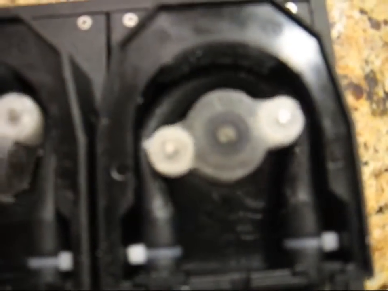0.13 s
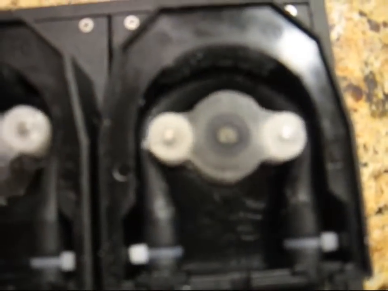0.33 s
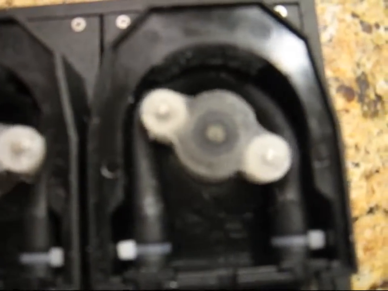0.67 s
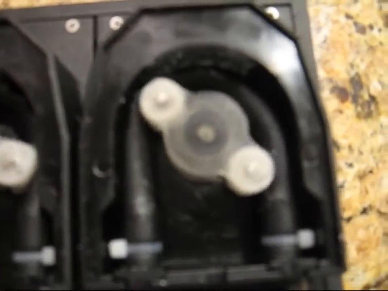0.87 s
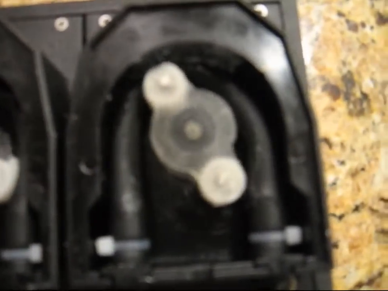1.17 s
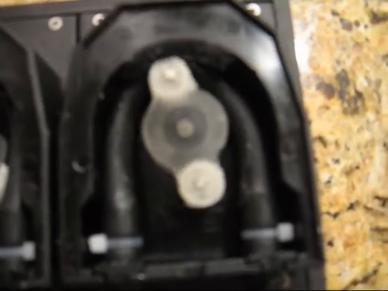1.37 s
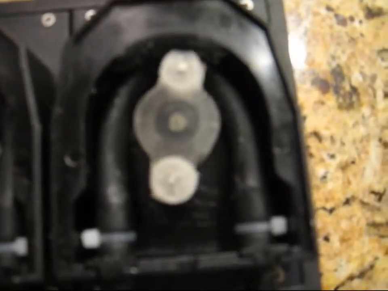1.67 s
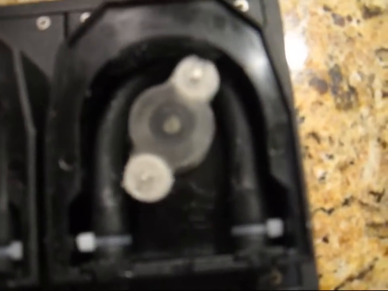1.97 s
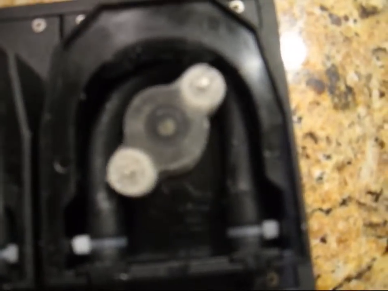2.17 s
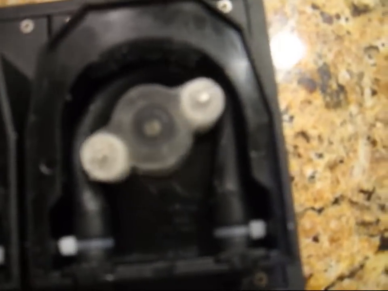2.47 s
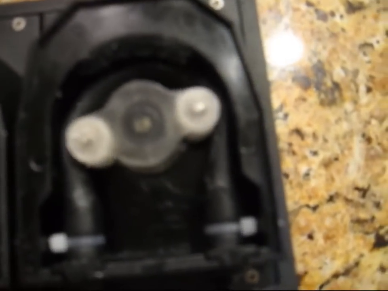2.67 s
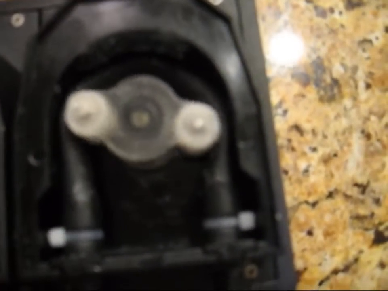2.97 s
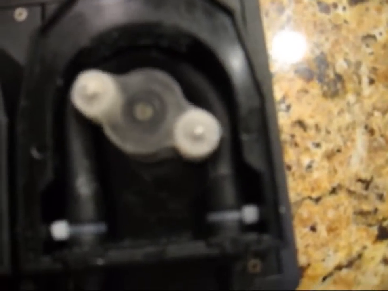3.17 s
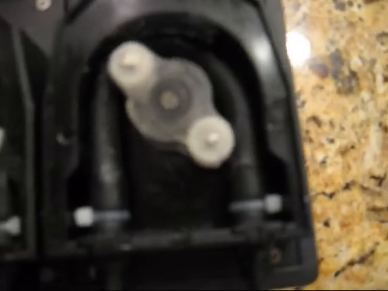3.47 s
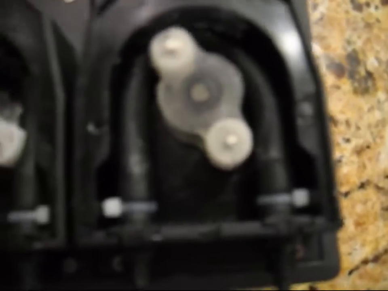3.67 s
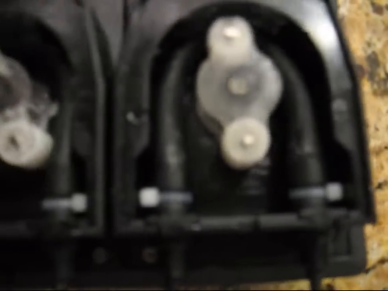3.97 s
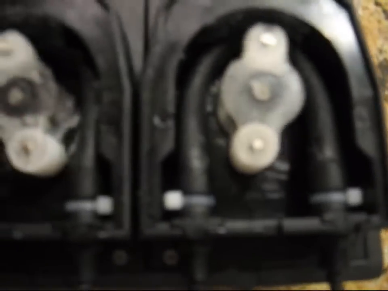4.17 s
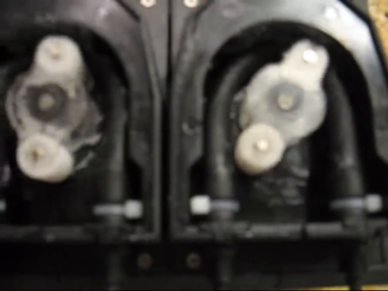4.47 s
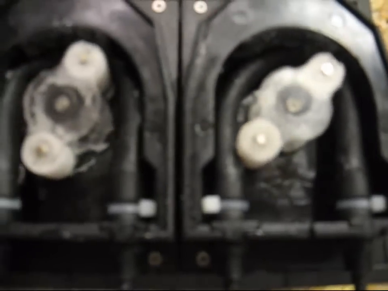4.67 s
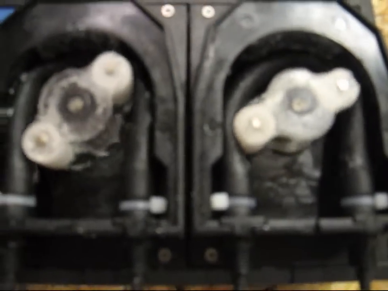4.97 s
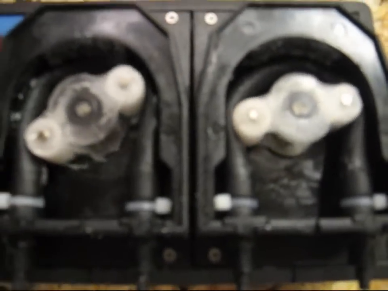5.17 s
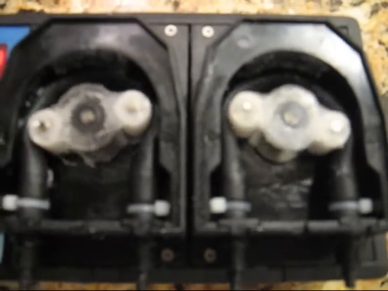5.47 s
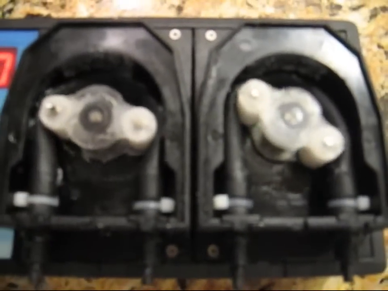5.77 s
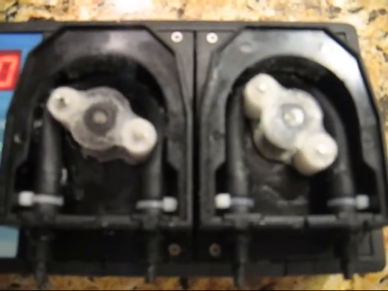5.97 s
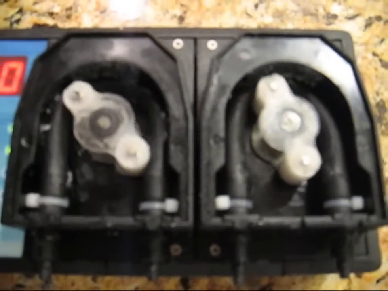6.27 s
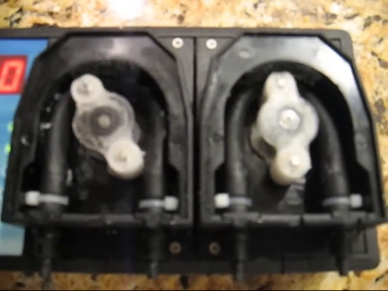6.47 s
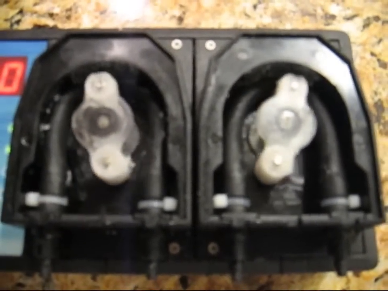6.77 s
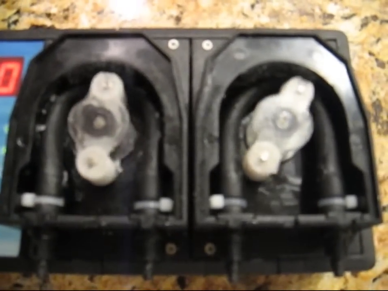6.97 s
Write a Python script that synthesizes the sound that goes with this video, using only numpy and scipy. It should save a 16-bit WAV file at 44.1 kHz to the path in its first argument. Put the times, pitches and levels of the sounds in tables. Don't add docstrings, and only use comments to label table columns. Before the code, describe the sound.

Two geared roller pumps run on a stone counter indoors, heard very close through a cheap, grainy small-camera microphone. A steady low-mid whine throbs over mains hum and gear rasp, with hoarse squeaks swelling as rollers press tubing. Fingers tick on the camera shell; around five seconds two loud plastic creaks make the pumps drop out briefly, then return.

```python
import sys
import numpy as np
from scipy import signal
from scipy.fft import rfft, irfft
from scipy.io import wavfile
from scipy.ndimage import uniform_filter1d, map_coordinates

SR = 44100
rng = np.random.default_rng(int(sys.argv[2]) if len(sys.argv) > 2 else 0)


def digitize_waveform(pressure):
    field = np.atleast_2d(pressure).T
    bounded = np.clip(field, -1, 1)
    quanta = np.round(bounded * 32767).astype(np.int16)
    wavfile.write(sys.argv[1], SR, quanta)


def volts_from_db(level):
    exponent = np.asarray(level, float) / 20
    return 10 ** exponent


N = 313992
TIME = np.arange(N) / SR
STORE_HZ, STORE_OFFSET = 11024, .4377


def curve(rows, col=1):
    return np.interp(TIME, [r[0] for r in rows], [r[col] for r in rows])


def unit(x):
    return x / np.sqrt(np.mean(x ** 2))


def band(x, hz, width_hz):
    return unit(signal.lfilter(*signal.iirpeak(hz, hz / width_hz, fs=SR), x))


def walk(rate_hz):
    hold = int(SR / rate_hz)
    steps = np.repeat(rng.standard_normal(N // hold + 1), hold)
    return unit(uniform_filter1d(uniform_filter1d(steps, hold), hold)[:N])


def sine(phase):
    return np.sqrt(2) * np.sin(phase + 2 * np.pi * rng.random())


def add(out, s, sound):
    i = int(s * SR)
    out[i:i + len(sound)] += sound[:N - i]


def hiss():
    return volts_from_db(-63) * band(rng.standard_normal(N), 2190, 3000.)


def tail(x):
    t = np.arange(6000) / SR
    t60_s = .18
    bands = sum(band(rng.standard_normal(len(t)), hz, 300.) for hz in (800, 2300, 3200))
    ringing = bands * volts_from_db(-60 * t / t60_s)
    return volts_from_db(-17) * signal.fftconvolve(x, ringing / np.sqrt(np.sum(ringing ** 2)))[:N]


def crack(hz, width_hz, decay_s=.0007):
    burst = rng.standard_normal(2048) * np.exp(-np.arange(2048) / SR / decay_s)
    out = band(band(burst, hz, width_hz), hz, 1.3 * width_hz)
    return out / abs(out).max()


def jolt():
    t = np.arange(2048) / SR
    push_s = 0.0017
    push = 0.13 * t / push_s * np.exp(1 - t / push_s)
    panels = np.sin(2 * np.pi * 259.0 * t) + 2.05 * np.sin(2 * np.pi * 574.0 * t)
    return push + panels * np.exp(-t / 0.0024)


# pitch in Hz, level in dB, 60 dB decay in seconds.
SHELL_MODES = [(570, -8, .03), (850, -7, .024), (1150, -3, .022), (1345, -1, .022), (1600, -1, .022),
               (1900, -1, .02), (2310, -2, .018), (2650, -4, .016), (3150, -5, .016), (3600, -14, .012),
               (4600, -24, .012), (5130, -22, .012)]


def ring(centre_hz, crack_db, decay_share, crack_hz, spread=0.73):
    t = np.arange(2048) / SR
    hz, db, t60 = np.transpose(SHELL_MODES)[:, :, None]
    chance = rng.standard_normal((3, len(hz), 1))
    nearness = np.exp(-(np.log(hz / centre_hz) / spread) ** 2)
    gain = volts_from_db(.6 * db + chance[0]) * nearness
    phase = 2 * np.pi * hz * (1 + .03 * chance[1]) * t + 3 * chance[2]
    push = 1 - np.exp(-(t / .0005) ** 2)
    modes = push * (gain * np.sin(phase) * volts_from_db(-60 * t / (decay_share * t60))).sum(axis=0)
    both = modes / abs(modes).max() + volts_from_db(crack_db + 12.0) * crack(crack_hz, 1200.0)
    return np.r_[np.zeros(30), both / abs(both).max()]


# start in seconds, peak in dB, ring centre in Hz, crack in dB.
FINGER_TICKS = [(1.0757, -19, 1300, -14), (1.084, -22, 1500, -29), (1.0942, -24, 1830, -19),
                (1.1076, -31, 2510, -39), (1.3358, -37, 2480, -18), (1.436, -25.5, 2400, -25),
                (1.4347, -21.5, 1260, -18), (2.1814, -19, 2960, -4), (2.1845, -26, 1280, -30),
                (3.571, -29, 1690, -43), (3.7588, -38, 2480, -16), (3.93, -30.5, 1710, -17),
                (4.358, -32, 1550, -12), (4.804, -33, 1472, -1), (4.8373, -16.5, 1280, -31),
                (4.8762, -23, 1500, -30), (5.2885, -23.5, 1805, -38), (5.3014, -19.5, 1214, -38),
                (5.3618, -14.5, 1180, -36), (5.371, -17.5, 1800, -39), (5.5256, -30.5, 1150, -27),
                (5.57, -31, 1200, -35), (5.5966, -34, 1840, -25), (5.787, -34.5, 1210, -29.5),
                (6.069, -21, 1500, -8.5), (6.077, -25, 1700, -26), (6.084, -19, 1120, -36),
                (6.103, -34, 2530, -28)]


def ticks():
    out = np.zeros(N)
    for s, db, hz, crack_db in FINGER_TICKS:
        add(out, s, volts_from_db(db) * ring(hz, crack_db, .82, 3640))
    return out


# start in seconds, peak in dB.
DRY_SNAPS = [
    (0.3735, -27),
    (1.939, -27.5),
    (2.1814, -19.5),
    (6.937, -18),
]


def snaps():
    out = np.zeros(N)
    for s, db in DRY_SNAPS:
        add(out, s + 0.00051, volts_from_db(db) * crack(3700., 3000., decay_s=0.000071))
    return out


# start in seconds, peak in dB, ring centre in Hz, crack in dB, jolt in dB relative to the peak.
SHELL_SLIPS = [(4.8835, -22, 2900, -12, -24), (4.888, -12, 2900, -14, -8), (4.8968, -23, 1200, -16, 1.5),
               (4.8995, -12.5, 2100, -10, -12), (4.908, -30, 2600, -20, -14), (4.912, -11, 2330, -18, -6),
               (4.9153, -11, 2000, -16, -11.5), (4.918, -12, 2500, -24, -21), (4.925, -9.5, 2500, -23, -16),
               (4.9315, -16.5, 1400, -15, -18), (4.936, -16, 1300, -20, -16),
               (4.941, -21, 2500, -14.5, -13), (5.0645, -6, 1500, -32, -19.5),
               (5.3565, -26, 1140, -30, -1.5), (5.374, -17, 1700, -38, -13), (5.377, -16, 1290, -33, -17),
               (5.3806, -11.5, 1900, -32, -6), (5.382, -6.5, 1300, -27, -9), (5.386, -10, 1900, -21, -19),
               (5.393, -10.5, 2300, -11.5, -26), (5.3955, -17, 2800, -21, -22),
               (5.398, -24, 1300, -20, -13)]


def slips():
    out = np.zeros(N)
    for s, db, hz, crack_db, jolt_db in SHELL_SLIPS:
        add(out, s + 0.00037, volts_from_db(db) * ring(hz, crack_db - 0.5, 0.83, crack_hz=5230.0, spread=0.94))
        add(out, s, volts_from_db(db + jolt_db - 4) * jolt() * rng.choice([-1, 1]))
    return out


# start in seconds, peak in seconds, end in seconds, peak in dB.
SHELL_CREAKS = [
    (4.869, 4.921, 4.948, -7.5),
    (5.361, 5.392, 5.412, -9),
]


def scrapes():
    grit = volts_from_db(3.5 * walk(500.)) * rng.standard_normal(N)
    scrape = unit(sum(volts_from_db(.6 * db) * band(band(grit, hz, 350.), hz, 350.) for hz, db, _ in SHELL_MODES))
    out = np.zeros(N)
    for start, peak, end, db in SHELL_CREAKS:
        swell = [(start - .004, -90), (start, db - 16), (peak, db), (end, db - 29), (end + .004, -90)]
        out += volts_from_db(curve(swell) - 13) * scrape
    return out


# start in seconds, gain reached in dB.
GAIN_DUCKS = [
    (4.914, -20),
    (5.066, -10.5),
    (5.39, -27),
    (6.085, -1),
    (6.922, -6),
]


def camera_gain():
    full_db, backed_off_db, duck_s, recover_per_s = -.5, -1.43, 0.027, 1.2
    out = np.where(TIME < GAIN_DUCKS[0][0], volts_from_db(full_db), volts_from_db(full_db + backed_off_db))
    for s, db in GAIN_DUCKS:
        falling = 1 - (1 - volts_from_db(db)) * (TIME - s) / duck_s
        climbing = volts_from_db(db) + recover_per_s * (TIME - s - duck_s)
        out = np.minimum(out, np.maximum(falling, climbing))
    return out


def teeth():
    mesh_hz, depth = 180.8, 0.32
    mesh = 1 + depth * np.sin(2 * np.pi * mesh_hz * TIME)
    return mesh * volts_from_db(1.3 * walk(300.)) * rng.standard_normal(N)


# centre in Hz, width in Hz, level in dB.
SQUEAK_BANDS = [(2278, 150, 1), (2480, 170, -1.5), (2660, 130, -3.5), (3984, 470, -16)]
# full load in seconds, level in dB, squeal in Hz.
ROLLER_PRESSES = [
    (1.08, -45, 2560),
    (2.1, -53, 2660),
    (3.6, -46.5, 2600),
    (4.45, -49.5, 2315),
    (6.049, -45.5, 2504),
]


def rollers():
    rise_db_s, hold_s, fall_db_s, rest_db = 15, .28, 42, -55.5
    sag_hz_s, squeal_width_hz = 229.9, 300.
    s, db, hz = np.transpose(ROLLER_PRESSES)[:, :, None]
    late = TIME - s
    load = db - rise_db_s * np.maximum(-late, 0) - fall_db_s * np.maximum(late - hold_s, 0)
    pitches = hz - sag_hz_s * np.clip(late, -.5, .5)
    strongest = load.argmax(axis=0)[None]
    pitch = np.take_along_axis(pitches, strongest, axis=0)[0]
    rub = teeth()
    hoarse = unit(sum(volts_from_db(d + 1.6 * walk(5.)) * band(rub, c, w) for c, w, d in SQUEAK_BANDS))
    turn = 2 * np.pi * np.cumsum(pitch) / SR
    squeal = walk(squeal_width_hz) * np.cos(turn) + walk(squeal_width_hz) * np.sin(turn)
    level = volts_from_db(np.maximum(load.max(axis=0), rest_db) - 3.5)
    return level * (hoarse + volts_from_db(-2 + 1.5 * walk(16.)) * squeal)


# pitch in Hz, level in dB per Hz.
RASP_SPECTRUM = [(30, -22), (48, -3), (70, -7), (100, -12), (170, -3), (300, -0.5), (500, -6.5),
                 (900, -4.5), (1050, -11), (1700, -11), (1950, -15.5), (2700, -17), (3500, -19),
                 (5000, -25)]


def rasp():
    hz, db = np.transpose(RASP_SPECTRUM)
    f = np.maximum(np.arange(N // 2 + 1) * SR / N, 1)
    spectrum = rfft(teeth()) * volts_from_db(np.interp(np.log(f), np.log(hz), db, left=-30))
    out = 0
    for octave in np.arange(4, 14):
        share = np.clip(1 - abs(np.log2(f) - octave), 0, 1)
        out = out + volts_from_db(1.3 * walk(9.)) * irfft(spectrum * share, N)
    return volts_from_db(-40) * unit(out)


# centre in Hz, width in Hz, level in dB.
HOUSING_PANELS = [(352, 40, -50), (543, 40, -51), (582.8, 20, -55.5), (681.3, 50, -51.5), (811.6, 60, -54),
                  (1594, 200, -56.5)]


def panels():
    return sum(volts_from_db(db + 2.2 * walk(4.)) * band(rng.standard_normal(N), hz, width)
               for hz, width, db in HOUSING_PANELS)


# time in seconds, pitch in Hz.
MOTOR_DRIFT = [
    (0, 144.3),
    (2, 145.9),
    (3, 144.7),
    (4, 143.6),
    (5, 142.8),
    (7.12, 142.5),
]
MOTOR_DB = [-46, -56, -64, -59]


def slow_motor():
    turn = 2 * np.pi * np.cumsum(curve(MOTOR_DRIFT)) / SR
    return sum(volts_from_db(db + 1.5 * k * walk(4.)) * sine((k + 1) * turn) for k, db in enumerate(MOTOR_DB))


# time in seconds, beats so far, level in dB under the whine.
ROTOR_BEATS = [
    (0, -.47, -15.5),
    (2.4, 6.56, -13),
    (3.2, 9.89, -12.5),
    (4.5, 14.91, -11.5),
    (5.1, 17.59, -12),
    (7.12, 25.04, -12.5),
]


def field():
    whine_turns = 359.96 * TIME
    mains = 2 * np.pi * whine_turns / 6
    rotor = 2 * np.pi * (whine_turns - curve(ROTOR_BEATS)) / 8
    return mains, rotor


# pitch in Hz, level in dB.
GEAR_TONES = [(164.5, -56.0), (233.8, -58.5), (236.2, -57.5), (285.7, -49), (298.3, -56.5), (365.2, -54),
              (387.6, -55), (571.8, -58.0), (827.0, -62), (886.1, -57.0), (1122.4, -69.5), (1739.5, -70.5),
              (2249.7, -65.5), (2969.7, -75)]
MAINS_DB = {1: -62, 2: -42.5, 4: -56, 7: -62, 8: -61, 12: -55, 20: -66}
ROTOR_DB = {3: -63, 4: -53.5, 5: -56, 6: -53, 9: -54, 12: -57.5, 16: -56, 17: -60.5, 18: -54, 36: -64.5}


def hum():
    mains, rotor = field()
    tones = [(hz, db, 2 * np.pi * hz * TIME) for hz, db in GEAR_TONES]
    tones += [(k * 60, db, k * mains) for k, db in MAINS_DB.items()]
    tones += [(k * 44.5, db, k * rotor) for k, db in ROTOR_DB.items()]
    out = np.zeros(N)
    for hz, db, phase in tones:
        waver_db = .012 * hz ** .5 * 6.0 * walk(3.)
        out += volts_from_db(db + waver_db - hz / 900) * sine(phase)
    return out


def whine():
    mains, rotor = field()
    tone = volts_from_db(0.5 * walk(8.)) * np.sin(6 * mains + .08 * walk(5.))
    beat = volts_from_db(curve(ROTOR_BEATS, col=2) + 1.5 * walk(3.)) * np.sin(8 * rotor)
    return volts_from_db(-32) * np.sqrt(2) * (tone + beat)


def scene():
    gain = camera_gain()
    pumps = gain * (rollers() + rasp() + panels() + slow_motor() + hum() + whine())
    handling = ticks() + snaps() + slips() + scrapes()
    return (hiss() + np.sqrt(gain) * tail(handling) + handling + pumps)[None]


def store(x):
    step = 1 / 128.5
    places = (np.arange(-2, N * STORE_HZ // SR + 4) + STORE_OFFSET) * SR / STORE_HZ
    return step * np.floor(map_coordinates(x, [places], order=3, mode="nearest") / step + .06)


def stretch(stored):
    where = np.arange(N) * STORE_HZ / SR - STORE_OFFSET + 2
    k = where.astype(int)
    u = where - k
    a, b, c, d = stored[k - 1], stored[k], stored[k + 1], stored[k + 2]
    outer = (-u * (u - 1) * (u - 2) * a + (u + 1) * u * (u - 1) * d) / 6
    inner = (u + 1) * (u - 2) * ((u - 1) * b - u * c) / 2
    return outer + inner


def band_limit(x):
    return signal.sosfilt(signal.butter(12, 16480, fs=SR, output="sos"), x)


def record(dry):
    soft = signal.sosfiltfilt(signal.butter(3, 6500., fs=SR, output="sos"), dry[0])
    soft = .6 * np.tanh(soft / .6)
    wide = stretch(store(soft))
    wide = signal.sosfiltfilt(signal.ellip(8, .05, 40, 15850., fs=SR, output="sos"), wide)
    return band_limit(wide[None])


dry = scene()
out = record(dry)
digitize_waveform(out)
```